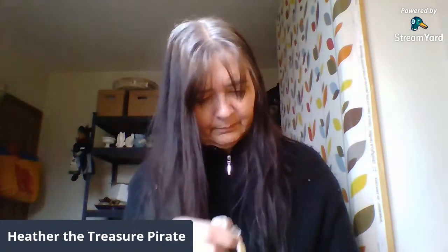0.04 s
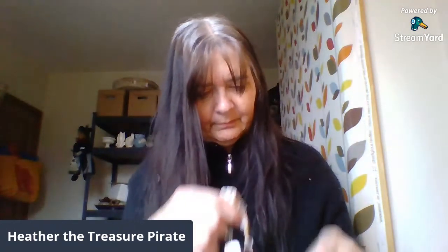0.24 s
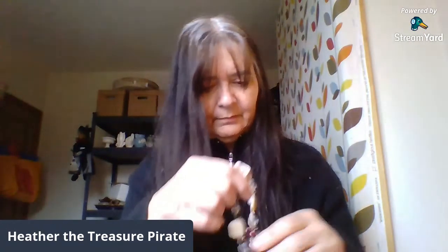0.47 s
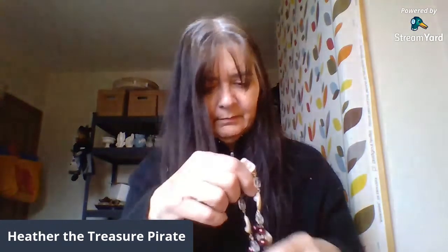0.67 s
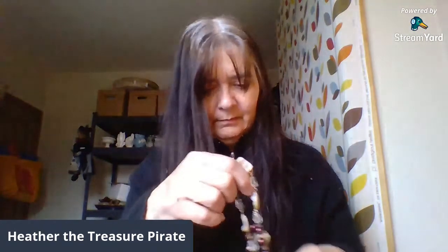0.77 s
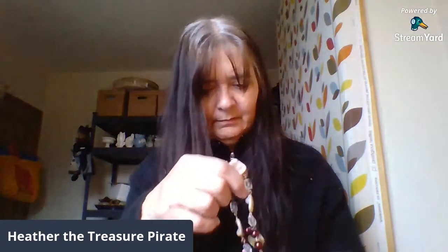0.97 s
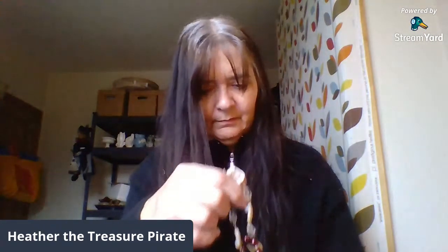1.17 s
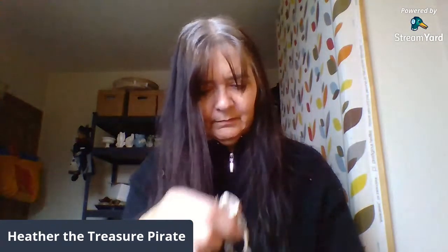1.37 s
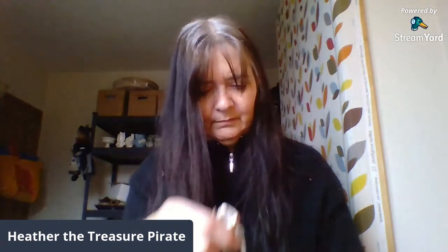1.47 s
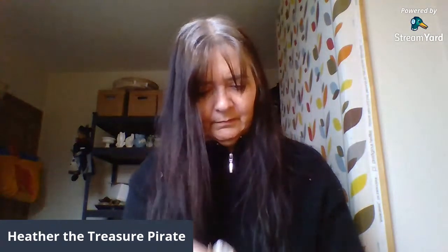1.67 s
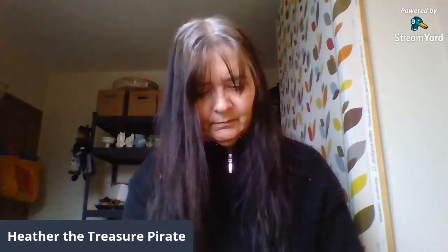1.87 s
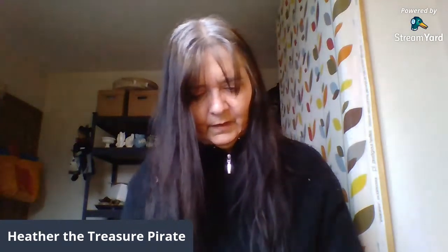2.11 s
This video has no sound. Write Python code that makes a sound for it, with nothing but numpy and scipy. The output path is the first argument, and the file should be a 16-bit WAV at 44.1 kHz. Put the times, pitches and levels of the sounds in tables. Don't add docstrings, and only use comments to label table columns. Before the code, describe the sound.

Beads and costume jewellery clack and rattle on a table, pause, then clatter again more briefly

```python
import sys
import numpy as np
from scipy import signal
from scipy.io import wavfile
from scipy.ndimage import uniform_filter1d, minimum_filter1d

SR = 44100
rng = np.random.default_rng(int(sys.argv[2]) if len(sys.argv) > 2 else 0)


def store_wav(level_fs):
    pcm = np.round(np.clip(np.atleast_2d(level_fs), -1, 1) * 32767)
    wavfile.write(sys.argv[1], SR, pcm.T.astype(np.int16))


def elevation(decibels):
    levels = np.asarray(decibels, float)
    return 10 ** (levels / 20)


N = 94550

# (pitch ratio, level [dB], time to fade by 60 dB [s])
BIG_BEAD_MODES = [(1.0147, -4, 0.013), (1.55, -8.5, 0.0044), (0.5337, -8.5, 0.01), (2.3, -9, 0.0032)]
# (pitch ratio, level [dB], time to fade by 60 dB [s])
SMALL_BEAD_MODES = [(1, 6.5, 0.01), (.74, -4.5, 0.0064), (1.27, -5, 0.02), (1.62, -3, 0.013),
                    (2.1, 0.5, 0.0055)]
# (frequency [Hz], level [dB])
MIC_TONE = [(60, -36), (500, -16), (620, -3), (3000, 0), (6500, 2.5), (7300, -12), (8200, -27.5),
            (9000, -62)]
BIG_TICK_DB, SMALL_TICK_DB = -10.5, 3
KNOCK = 4000
LEAD = 176


def evened(x):
    return x / np.sqrt(np.mean(x ** 2) + 1e-20)


def colour(x, points):
    f, db = np.transpose(points)
    hz = abs(np.fft.fftfreq(4096, 1 / SR))
    log_gain = np.log(elevation(np.interp(np.log(hz + 1), np.log(f + 1), db)))
    taps = np.fft.ifft(np.exp(np.conj(signal.hilbert(log_gain)))).real[:2048]
    return signal.oaconvolve(x, taps)[:len(x)]


def patchy(x, depth_db):
    z = signal.stft(x, nperseg=256, noverlap=192)[2]
    patches = uniform_filter1d(rng.standard_normal(z.shape), 7, 0)
    patches = uniform_filter1d(patches, 14, 1)
    shared = uniform_filter1d(rng.standard_normal(z.shape[1]), 6)
    gain = elevation(depth_db * (evened(patches) + 0.2 * evened(shared)))
    return evened(signal.istft(z * gain, nperseg=256, noverlap=192)[1][:N])


def ring(hz, modes, tick_db):
    t = np.arange(2500) / SR
    tones = sum(elevation(db - 60 * t / t60) * np.sin(2 * np.pi * hz * ratio * t) for ratio, db, t60 in modes)
    tick = elevation(tick_db) * 4 * (t == 0)
    lowest = hz * min(ratio for ratio, _, _ in modes)
    edge = signal.butter(4, lowest * 1.014, "highpass", fs=SR, output="sos")
    return signal.sosfilt(edge, tones + tick)


def contacts(shape, per_s):
    hit = rng.random(shape) < per_s / SR
    sign = rng.choice([-1., 1.], shape)
    spread_db = 3
    return hit * sign * elevation(spread_db * np.minimum(rng.exponential(1, shape), 3))


def room():
    length, level_db, t60_s = 6000, -4.5, 0.041
    echoes = np.zeros(length)
    at = np.arange(100, length - 20, 20)
    echoes[at + rng.integers(0, 20, len(at))] = rng.choice([-1., 1.], len(at))
    echoes *= elevation(-60 * np.arange(length) / SR / t60_s)
    direct = np.arange(length) == 0
    return elevation(level_db) * echoes / np.linalg.norm(echoes) + direct


def knocks(table, modes, tick_db):
    bounces_per_s, lead_t60_s = 880, .012
    gate_share, gate_s = .36, .002
    out = np.zeros(N + KNOCK)
    t = (np.arange(KNOCK) - LEAD) / SR
    s, db, hz, t60 = np.transpose(table)[:, :, None]
    blows = contacts((len(table), KNOCK), bounces_per_s) + elevation(4.0) * (t == 0)
    blows *= elevation(60 * np.minimum(t, 0) / lead_t60_s)
    blows = blows * elevation(-60 * np.maximum(t, 0) / np.maximum(t60, .004))
    rings = np.array([ring(f, modes, tick_db) for f in hz[:, 0]])
    sounds = signal.fftconvolve(blows, rings, axes=1)[:, :KNOCK]
    sounds = signal.fftconvolve(sounds, room()[None, :KNOCK], axes=1)[:, :KNOCK]
    sounds = sounds / (1 + np.exp(np.minimum((t - gate_share * t60 - .005) / gate_s, 50)))
    sounds = elevation(db) * sounds / abs(sounds).max(1, keepdims=True)
    for at, sound in zip(np.round(s[:, 0] * SR).astype(int), sounds):
        out[at:at + KNOCK] += sound
    return out[LEAD:N + LEAD]


def strikes(table, modes, tick_db):
    out, space = np.zeros(N + KNOCK), room()[:1500]
    for s, db, hz in table:
        sound = signal.fftconvolve(ring(hz, modes, tick_db), space)
        out[round(s * SR):][:len(sound)] += elevation(db) * sound / abs(sound).max()
    return colour(out[:N], MIC_TONE)


def hush():
    # (frequency [Hz], level per Hz [dB])
    hiss_tone = [(40, -21.5), (130, 0.5), (800, -2), (3000, -5), (7000, -19.5), (7800, -48.5)]
    return elevation(-68.5) * patchy(colour(rng.standard_normal(N), hiss_tone), depth_db=5.5)


def heap(lo_hz, hi_hz, modes, per_s, tick_db):
    hits, bead = contacts(N, per_s), rng.integers(14, size=N)
    out = np.zeros(N)
    for k, hz in enumerate(np.geomspace(lo_hz, hi_hz, num=14)):
        out += signal.oaconvolve(hits * (bead == k), ring(hz, modes, tick_db)[:1000])[:N]
    return evened(out)


def rattle():
    # (time [s], rattle level [dB], small bead share [dB])
    stirring = [(0, -18.5, -9), (0.062, -20.5, -7.5), (0.166, -32.5, -11), (0.224, -20, -14),
                (.32, -22.5, -24), (0.391, -23, -8.5), (0.469, -47, -5), (0.701, -55.5, 5),
                (0.772, -81.5, -1), (0.872, -64.5, -7), (0.949, -53, -15), (1.05, -69.5, -10),
                (1.321, -71, -3), (1.399, -41.5, -4), (1.5, -29.5, -2), (1.689, -23, -13.5),
                (1.77, -77, -6.5), (2.14, -68.5, -1)]
    s, level_db, small_db = np.transpose(stirring)
    t = np.arange(N) / SR
    big = heap(650, 1900, BIG_BEAD_MODES, 1000, BIG_TICK_DB)
    small = heap(2300, 6600, SMALL_BEAD_MODES, 1600, SMALL_TICK_DB)
    big, small = patchy(big, depth_db=-1.5), patchy(small, depth_db=1.0)
    rumble = colour(rng.standard_normal(N), [(30, -42), (250, -7), (500, -7.0), (700, -42.5)])
    rumble = patchy(rumble, depth_db=4.5)
    beads = colour(big + elevation(np.interp(t, s, small_db)) * small, MIC_TONE)
    return elevation(np.interp(t, s, level_db)) * (beads + elevation(-27.5) * rumble)


def big_clacks():
    # (time [s], peak level [dB], pitch [Hz], bounce fade by 60 dB [s])
    first_big = [(0.004, -33, 1176, 0.025), (0.027, -2.5, 1260, 0.061), (0.087, 7, 1495, 0.0052),
                 (0.096, -9.5, 830, 0.025), (0.116, -9, 1350, 0.059), (0.188, -12, 1790, 0.12),
                 (0.239, 1, 1745, 0.13), (0.247, 0.5, 762, 0.061), (0.274, -4.5, 1452, 0.04),
                 (0.339, -7, 1840, 0.11), (0.353, 0.5, 1512, 0.081), (0.367, 4, 677, 0.034),
                 (0.418, -7, 625, 0.021), (0.427, -6.5, 800, 0.068), (0.494, -19.5, 630, 0.087),
                 (0.543, -23, 724, 0.13), (0.603, -24, 1710, 0.058), (0.67, -23, 2125, 0.07),
                 (0.68, -22, 1754, 0.13)]
    second_big = [(0.894, -37.5, 1140, 0.15), (0.929, -34.5, 660, 0.07), (1.096, -38.5, 829, 0.079),
                  (1.115, -37, 1110, 0.034), (1.365, -14.5, 1704, 0.075), (1.413, -17.5, 899, 0.04),
                  (1.435, -8.5, 1250, 0.027), (1.445, -6, 1520, 0.04), (1.496, -11, 829, 0.071),
                  (1.521, -13, 729, 0.084), (1.531, -7.5, 705, 0.034), (1.552, -10, 821, 0.031),
                  (1.585, -14.5, 1490, 0.051), (1.629, -7, 1580, 0.016), (1.638, -6, 1220, 0.065),
                  (1.674, 0.5, 832, 0.045), (1.712, -25.5, 603, 0.076), (1.991, -36.5, 1460, 0.0303),
                  (2.009, -21.5, 1660, 0.065), (2.123, -44, 678, 0.06), (2.012, -20.5, 798, 0.088)]
    first = knocks(first_big, BIG_BEAD_MODES, BIG_TICK_DB)
    second = knocks(second_big, BIG_BEAD_MODES, BIG_TICK_DB)
    return colour(first + second, MIC_TONE)


def small_clinks():
    # (time [s], peak level [dB], pitch [Hz], bounce fade by 60 dB [s])
    first_small = [(0.0174, -10.5, 2950, 0.12), (0.0868, -14.5, 3460, 0.011), (0.188, -18, 3560, 0.039),
                   (0.2059, -13.5, 3390, 0.078), (0.2389, -9, 2480, 0.021), (0.2458, -7, 2880, 0.031),
                   (0.3406, -14, 4320, 0.11), (0.3526, 0.5, 2524, 0.049), (0.3644, -7.5, 2840, 0.089),
                   (0.4179, -13.5, 3094, 0.091), (0.4264, -15.5, 3500, 0.023), (0.4923, -30.5, 3790, 0.034),
                   (0.5417, -30, 2760, 0.085), (0.5916, -31.5, 4300, 0.038), (0.6055, -25, 4070, 0.014),
                   (0.6475, -27, 4660, 0.026), (0.6689, -27, 4430, 0.03), (0.6804, -29.5, 2440, 0.16),
                   (0.7134, -36, 5340, 0.036), (0.8900, -36, 2840, 0.21), (0.8999, -29, 6390, 0.093),
                   (0.9323, -30.5, 3590, 0.044), (1.098, -32.5, 2930, 0.063)]
    second_small = [(1.097, -34.5, 5600, 0.081), (1.202, -33, 5400, 0.015), (1.212, -36.5, 5520, 0.026),
                    (1.897, -44, 6500, .03), (1.355, -28, 6840, 0.035), (1.3663, -21.5, 2874, 0.095),
                    (1.414, -13.5, 2830, 0.14), (1.4346, -18, 2270, 0.04), (1.4975, -8.5, 4980, 0.032),
                    (1.5124, -27, 4930, 0.021), (1.5524, -11.5, 3050, 0.038), (1.6067, -14, 2230, 0.076),
                    (1.6292, -6.5, 3400, 0.023), (1.6382, -6.5, 2220, 0.04), (1.6726, -13, 2920, 0.025),
                    (1.7145, -45.5, 3700, 0.047), (1.8848, -33.5, 6580, 0.008), (1.9048, -22, 6190, 0.094),
                    (1.9134, -27.5, 5530, 0.058), (1.925, -27, 5650, 0.1), (1.9479, -26, 5150, 0.047),
                    (1.9578, -33.5, 5070, 0.04), (1.9674, -26, 4980, 0.034), (1.9903, -29.5, 3620, 0.03),
                    (2.0044, -24, 4840, 0.071), (2.0792, -48, 7000, 0.017), (2.1211, -45.5, 3470, 0.054)]
    first = knocks(first_small, SMALL_BEAD_MODES, SMALL_TICK_DB)
    second = knocks(second_small, SMALL_BEAD_MODES, SMALL_TICK_DB)
    return colour(first + second, MIC_TONE)


def small_strikes():
    # (time [s], peak level [dB], pitch [Hz])
    single_ticks = [(0.0279, -6, 2860), (0.043, -9, 3700), (0.0869, -4, 3830), (0.1449, -18, 2270),
                    (0.1526, -33, 2220.0), (0.2004, -8, 3040), (0.2069, -7.5, 2900), (0.2475, -8, 3170),
                    (0.2519, -17, 3170.0), (0.2694, -15, 2310), (0.2781, -26, 3320.0), (0.3414, -15.5, 3880),
                    (0.3842, -3, 3750.0), (0.3902, -10.5, 2870), (0.4265, -17, 3190.0),
                    (0.5426, -27.2, 2760.0), (0.5588, -27, 5130), (0.602, -21, 4560), (0.6376, -13, 2700),
                    (0.657, -28.4, 2580), (0.6947, -28.5, 2580.0), (0.7112, -31, 5040.0),
                    (1.3687, -17.5, 2820.0), (1.382, -11.5, 2920), (1.4137, -23, 2780.0),
                    (1.4256, -26, 2860.0), (1.4945, -8, 4770), (1.5691, -29, 2780.0), (1.639, 3, 3620),
                    (1.6488, -18, 2400), (1.6732, -7, 4820), (1.8633, -54.2, 5660.0), (1.9335, -17, 6670),
                    (1.9472, -18, 5100.0), (1.9578, -20.5, 4870), (1.9917, -27, 4480),
                    (1.343, -40, 6700),
        (1.794, -59, 5600),
        (1.808, -55.5, 5030),
        (1.85, -56.5, 5530),
    ]
    # (pitch ratio, level [dB], time to fade by 60 dB [s])
    tick_modes = [(1.1, 0, 0.0053), (.75, -3, .003), (1.45, -1, 0.0054)]
    return strikes(single_ticks, tick_modes, tick_db=1)


def table_thuds():
    # (time [s], peak level [dB], pitch [Hz], bounce fade by 60 dB [s])
    thuds = [
        (.03, -40.5, 294, 0.087),
        (.11, -45.5, 117.9, 0.099),
        (.345, -21, 290, 0.12),
        (.365, -26, 216, 0.22),
        (1.442, -31.5, 212.5, 0.29),
        (1.636, -24.5, 239.8, 0.084),
        (1.672, -27, 253.5, 0.14),
    ]
    # (pitch ratio, level [dB], time to fade by 60 dB [s])
    table_modes = [(1.1, -2, 0.096), (1.7, 1, 0.021), (.6, -10.5, 0.053)]
    return knocks(thuds, table_modes, -54.5)


def big_strikes():
    # (time [s], peak level [dB], pitch [Hz])
    sharp_knocks = [(0.0358, -4, 1155), (0.0428, -2.5, 1173), (0.0469, -15, 820), (0.1234, -9, 1245),
                    (0.1453, -22.5, 1990), (0.1998, -16, 1940), (0.2391, -16, 1760), (0.2479, 2.6, 800),
                    (0.3028, -14, 1550), (0.3098, -9, 1310.0), (0.3283, -9.5, 1320), (0.4004, -15, 704),
                    (0.4267, -15, 745), (0.4672, -28, 810), (0.5442, -44, 810), (0.6081, -31.5, 1540),
                    (0.6942, -27, 1730), (1.3855, -22.5, 1691), (1.4641, -28, 1870), (1.4972, -24, 860.0),
                    (1.6678, -1.5, 1360.0), (1.6748, -1.5, 760), (1.6792, -4, 722), (1.7132, -20.5, 650.0)]
    # (pitch ratio, level [dB], time to fade by 60 dB [s])
    knock_modes = [(1, 3.5, 0.015), (1.6, -9, 0.004)]
    return strikes(sharp_knocks, knock_modes, tick_db=-10)


def long_clack():
    # (time [s], peak level [dB], pitch [Hz], bounce fade by 60 dB [s])
    long_bounces = [
        (.296, -13.5, 1445, .14),
    ]
    return colour(knocks(long_bounces, BIG_BEAD_MODES, BIG_TICK_DB), MIC_TONE)


def pendant():
    # (time [s], peak level [dB], pitch [Hz])
    taps = [
        (1.19, -62.5, 2500),
        (1.199, -41, 2400),
        (1.203, -27.5, 2400),
        (1.212, -26, 2400),
    ]
    # (pitch ratio, level [dB], time to fade by 60 dB [s])
    pendant_modes = [(0.999, -6.5, 0.051), (1.63, -4, 0.011), (2.26, 1, 0.016), (2.66, -6, 0.012)]
    return strikes(taps, pendant_modes, tick_db=-15)


def scene():
    bed = hush() + rattle()
    bouncing = big_clacks() + small_clinks() + table_thuds() + long_clack()
    single = small_strikes() + big_strikes() + pendant()
    return (bed + bouncing + single)[None]


def low_pass(x):
    return signal.sosfilt(signal.butter(12, 15780, fs=SR, output="sos"), x)


def record(dry):
    ceiling, link_hz = .9, 16000
    # (frequency [Hz], level [dB])
    mirror_tone = [(7500, -54.5), (8400, -18), (9100, -13.5), (9600, -36.5), (14500, -50), (16000, -58)]
    gain = minimum_filter1d(ceiling / np.maximum(abs(dry[0]), ceiling), size=161)
    gain = uniform_filter1d(uniform_filter1d(gain, size=80), size=80)
    held = dry[0] * gain
    flipped = held * np.cos(2 * np.pi * link_hz * np.arange(N) / SR)
    mix = (held + colour(flipped, mirror_tone))[None]
    return low_pass(mix)


dry = scene()
out = record(dry)
store_wav(out)
```